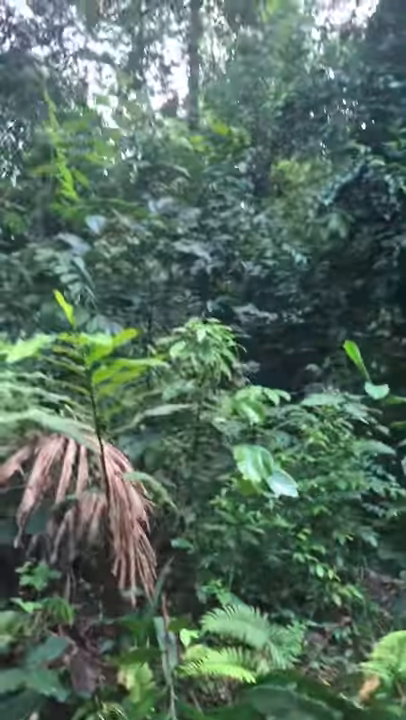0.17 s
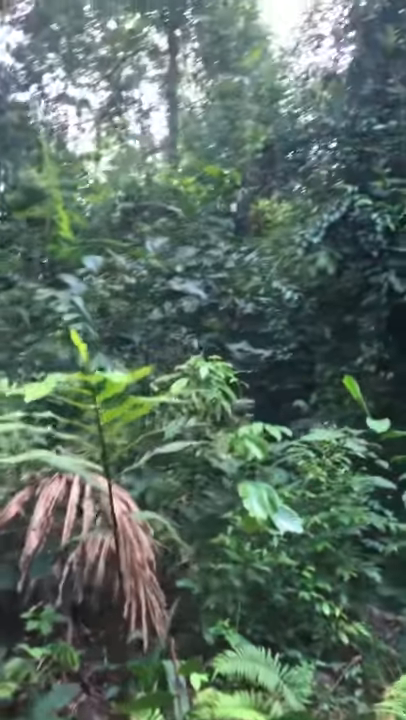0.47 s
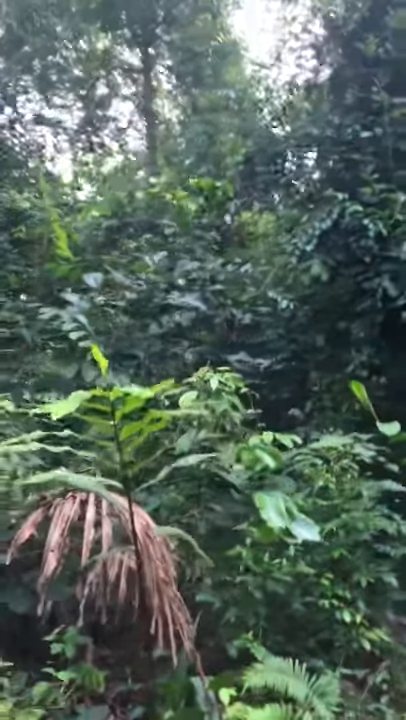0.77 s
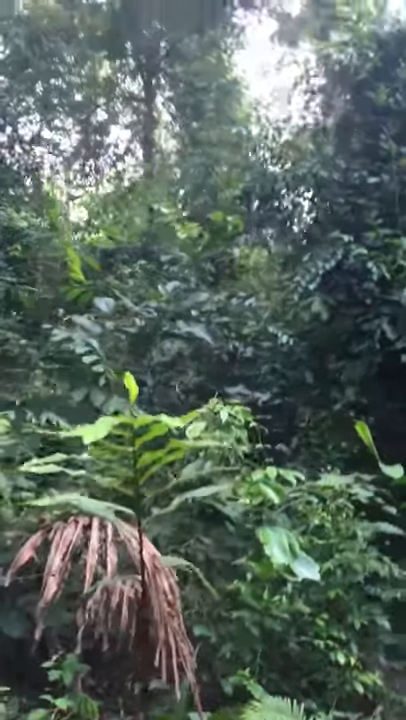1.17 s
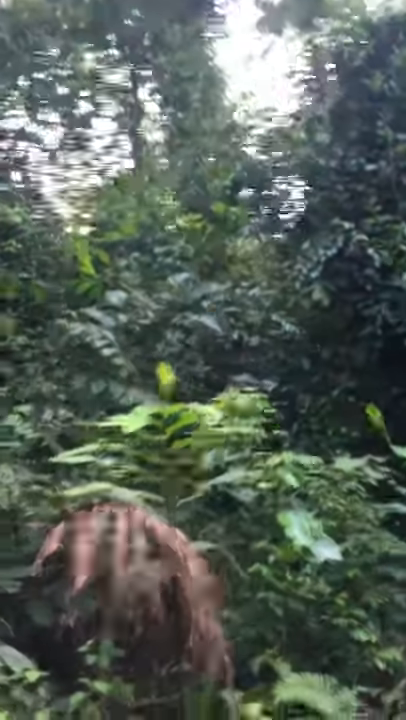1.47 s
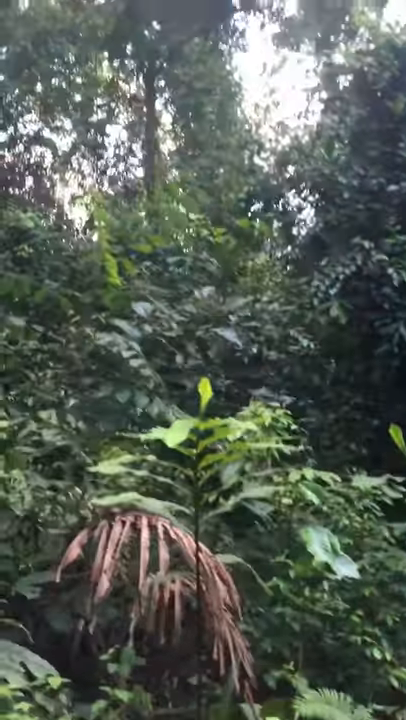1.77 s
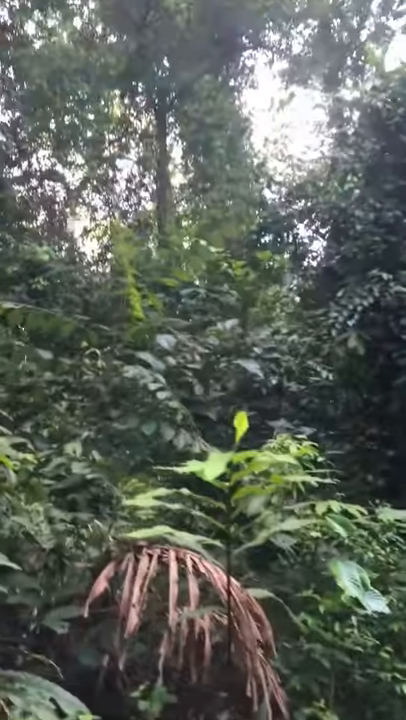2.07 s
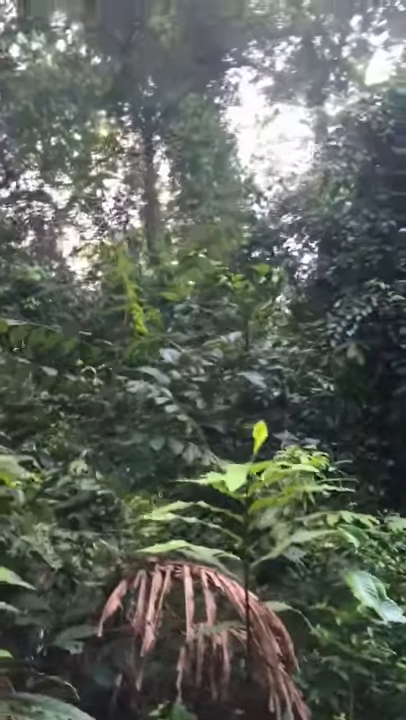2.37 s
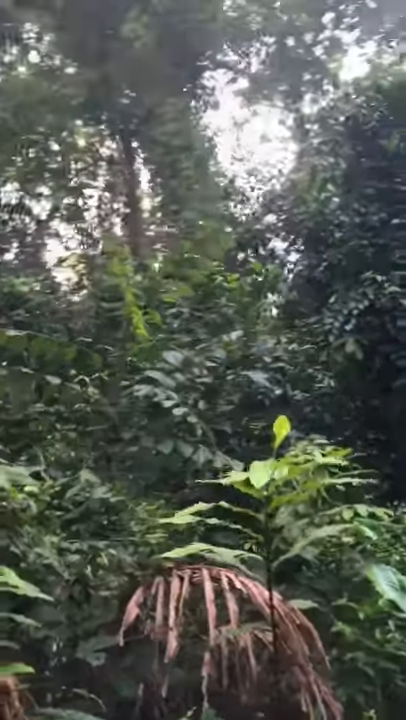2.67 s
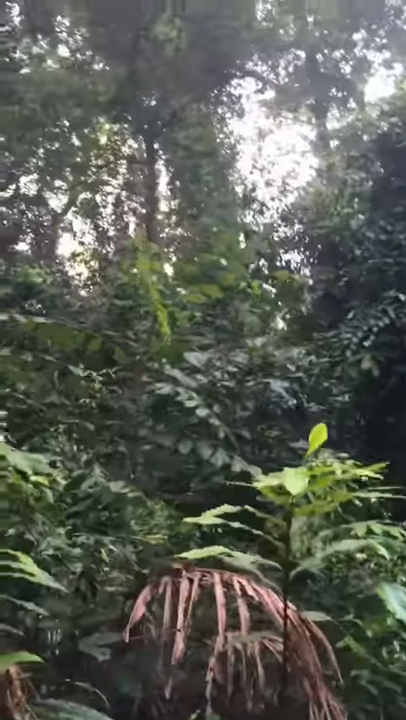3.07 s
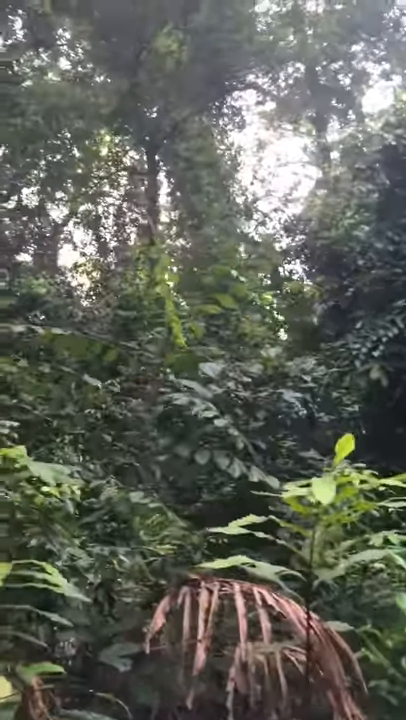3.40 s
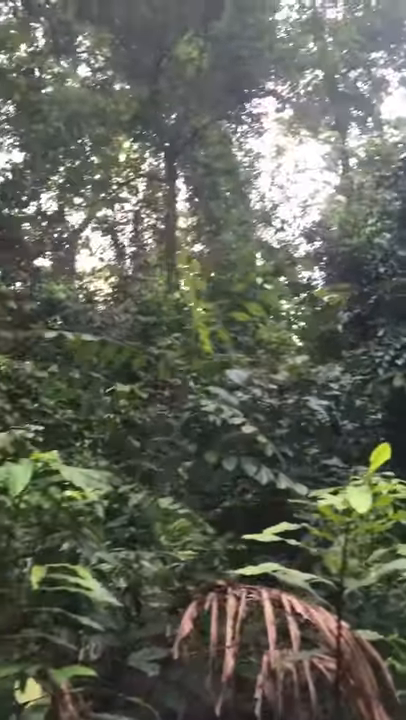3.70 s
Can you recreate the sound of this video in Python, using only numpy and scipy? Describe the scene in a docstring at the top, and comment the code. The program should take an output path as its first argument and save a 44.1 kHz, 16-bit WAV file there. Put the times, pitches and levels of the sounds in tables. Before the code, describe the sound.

Rising gibbon whoops echo through a rainforest, getting shorter and faster over soft insect hiss.

```python
"""A gibbon whoops in a rainforest: eleven rising, nearly pure calls that get shorter, faster and higher.
Foliage blurs them and the trunks scatter them into a tail that hangs among the trees.
Small birds chirp in quick slides, and a hand on the camera makes a few bumps and ticks.
Near the end something cracks in the undergrowth and the leaves rustle.
Behind it all, insects hiss steadily over a low forest murmur."""
import sys
import numpy as np
from scipy import signal
from scipy.fft import rfft, irfft
from scipy.io import wavfile
from scipy.ndimage import uniform_filter1d

SR = 44100
rng = np.random.default_rng(int(sys.argv[2]) if len(sys.argv) > 2 else 0)


def output_pcm(signal):
    """Save a mono or channel-first signal as 16-bit PCM at the path in sys.argv[1].

    Samples are clipped to [-1, 1] before scaling.
    """
    pcm = np.clip(np.atleast_2d(signal).T, -1, 1) * 32767
    wavfile.write(sys.argv[1], SR, np.round(pcm).astype(np.int16))


N = 169344

# One whoop a row: start_s, length_s, climb_from_hz, climb_to_hz, top_hz,
# leap_before_end_s, leap_time_s, overtone_db, overtone_entry_s
WHOOPS = [(-.06, .418, 629.6, 700.2, 1126, 0.025, 0.019, -5.5, .03),
          (0.587, 0.44, 640, 709, 1075, 0.031, 0.016, 2, 0.16),
          (1.215, 0.37, 649.8, 722.3, 1165, 0.021, 0.017, 2.5, 0.068),
          (1.761, 0.26, 677.4, 737.6, 1241, 0.019, 0.015, 1.5, 0.025),
          (2.172, 0.21, 661.3, 777.3, 1226, 0.021, 0.012, 2.5, 0.035),
          (2.515, 0.17, 664.8, 774, 1283, 0.023, .0124, 4.5, 0.078),
          (2.803, 0.15, 638, 800.4, 1241, 0.037, 0.012, 2.5, .08),
          (3.046, .13, 636, 821, 1237, .0335, 0.01133, 2, 0.059),
          (3.267, .12, 622.3, 793, 1230, .0354, 0.01092, 2, 0.047),
          (3.477, 0.12, 620.6, 818.6, 1209, 0.032, 0.0092, 0.5, 0.024),
          (3.677, 0.11, 644, 780, 1209, 0.035, 0.0098, 0.5, 0.04)]
# Level curves of the four long and the seven short whoops: time_s, level_db
LONG_WHOOP_LEVELS = [
    [(0.015, -45), (0.047, -36), (0.077, -36), (0.113, -35), (0.133, -50), (0.145, -35), (0.157, -39),
     (0.175, -46), (0.203, -36), (0.305, -36.5), (0.313, -36), (0.358, -50.5)],
    [(0.585, -34), (0.593, -47), (0.679, -40), (0.739, -36.5), (0.775, -35), (0.807, -45.5), (0.819, -46.5),
     (0.865, -35.5), (0.937, -38.5), (0.955, -33.5), (0.997, -41.5), (1.028, -49)],
    [(1.215, -54), (1.223, -51), (1.279, -36.5), (1.295, -44), (1.385, -35), (1.399, -32.5), (1.409, -51.5),
     (1.431, -32.5), (1.449, -41), (1.459, -32.5), (1.567, -41), (1.588, -41)],
    [(1.76, -54), (1.764, -46), (1.812, -43), (1.824, -38), (1.872, -37), (1.9, -32), (1.938, -30.5),
     (1.96, -40.5), (2.008, -38.5), (2.028, -41)],
]
SHORT_WHOOP_LEVELS = [
    [(2.175, -54), (2.185, -51.5), (2.213, -38), (2.221, -50), (2.245, -33.5), (2.295, -32), (2.305, -41.5),
     (2.365, -37), (2.383, -47.5)],
    [(2.51, -49.5), (2.546, -48.5), (2.578, -34), (2.616, -34.5), (2.642, -43.5), (2.66, -37), (2.692, -49)],
    [(2.8, -63), (2.818, -44.5), (2.836, -48), (2.87, -30), (2.89, -44.5), (2.908, -34.5), (2.938, -46.5)],
    [(3.045, -64), (3.051, -53), (3.101, -32.5), (3.121, -46.5), (3.129, -36), (3.161, -41), (3.175, -47)],
    [(3.27, -59), (3.284, -45.5), (3.306, -44), (3.32, -35), (3.374, -41), (3.39, -37.5)],
    [(3.48, -53.5), (3.508, -44.5), (3.522, -35.5), (3.58, -39.5), (3.595, -46.5)],
    [(3.68, -50), (3.708, -45.5), (3.72, -34), (3.766, -42.5), (3.785, -37)],
]
# EQ on the second harmonic: frequency_hz, gain_db
OVERTONE_EQ = [(1250, -16.5), (1380, -28.5), (1600, -21), (2000, -24), (2250, -14.5), (2380, -5),
               (2500, -23)]

def gibbon():
    """A nearly pure voice scoops up, climbs slowly and leaps; its octave opens up along the way."""
    scoop_hz, scoop_s, attack_s, release_s = 42.2, 0.0225, 0.005, 0.012
    out, waver = np.zeros(N), drift(size=300)
    for whoop, curve in zip(WHOOPS, list(LONG_WHOOP_LEVELS) + list(SHORT_WHOOP_LEVELS)):
        start, length, from_hz, to_hz, top_hz, before_end_s, leap_s, overtone_db, entry_s = whoop
        t = np.arange(0, length, 1 / SR)
        climb = from_hz + (to_hz - from_hz) * t / length - scoop_hz * np.exp(-t / scoop_s)
        hz = climb + (top_hz - climb) / (1 + np.exp((length - before_end_s - t) / leap_s))
        wobble = 1 + 0.006 * np.roll(waver, -round(start * SR))[:len(t)]
        phase = phase_of(hz * wobble)
        duck_db = -19.5 * np.clip(0.5 + (entry_s - t) / 0.014, 0, 1)  # holds the octave back at first
        overtone = amp(overtone_db + duck_db + curve_at(OVERTONE_EQ, 2 * hz)) * np.sin(2 * phase)
        gate = np.minimum(t / attack_s, 1) * np.minimum((length - t) / release_s, 1)
        level_db = uniform_filter1d(np.interp(start + t, *np.transpose(curve)), size=400) - 0.01
        add(out, start, np.sqrt(2) * amp(level_db) * gate * (np.sin(phase) + overtone))
    return out


# Bird notes: start_s, length_s, first_pitch_hz, last_pitch_hz, level_db
CHIRPS = [(.01, 0.045, 2570, 2483, -69), (0.64, 0.14, 4120, 4068, -69.5), (0.777, 0.21, 4140, 3990, -76.5),
          (0.85, 0.059, 3220, 3056, -66.5), (1.134, 0.032, 3460, 3750, -69),
          (1.176, 0.017, 2470, 3890, -61.5), (1.21, 0.025, 3060, 4470, -66),
          (1.24, 0.033, 5280, 3504, -57.5), (1.359, 0.0054, 4320, 3470, -55),
          (1.474, 0.039, 2880, 3840, -64.5), (1.513, 0.026, 3290, 4360, -65),
          (1.548, .044, 5290, 3510, -56.5), (2.816, 0.015, 3880, 3500, -60),
          (3.49, 0.045, 2750, 3600, -64.5), (3.542, 0.02, 2930, 3080, -57.5)]

def birds():
    """Thin whistles: falling notes drop fast and settle, rising notes slide evenly."""
    out, waver = np.zeros(N), drift(size=80)
    for start, length, first_hz, last_hz, db in CHIRPS:
        progress = np.arange(0, length, 1 / SR) / length
        bend = np.exp(-6 * progress) - np.exp(-6) if first_hz > last_hz else 1 - progress
        hz = last_hz + (first_hz - last_hz) * bend
        wobble = 1 + 0.0069 * np.roll(waver, -round(start * SR))[:len(progress)]
        arch = np.sqrt(2 * abs(np.sin(np.pi * progress)))
        add(out, start, amp(db) * arch * np.sin(phase_of(hz * wobble)))
    return out


# Bumps of the hand: start_s, thump_pitch_hz, thump_peak_s, thump_db, knock_db
BUMPS = [(0.232, 168, 0.0053, -55, -72), (0.436, 113, 0.0053, -60, -71), (0.532, 310, 0.0033, -56, -52),
         (.597, 248, 0.0017, -47, -48), (0.64, 185, 0.0044, -59, -43), (0.7514, 483, 0.00067, -64, -32.5),
         (0.95, 214, 0.0025, -40.5, -32), (1.671, 187, 0.0085, -55.5, -70), (2.0, 230, 0.0023, -56, -57),
         (2.482, 323, .0017, -47, -40), (2.582, 239.3, .003, -47, -39.5),
         (2.9395, 214, 0.0029, -43.5, -28.5), (3.171, 264, 0.0028, -60.5, -46),
         (3.436, 210, 0.003, -55.5, -49)]
# Ticks of the case: start_s, level_db
TICKS = [(0.4565, -39.5), (0.584, -48), (0.643, -50.5), (0.658, -51), (2.863, -42), (2.907, -49)]
# Tone of a knock and of a tick: frequency_hz, gain_db
KNOCK_EQ = [(30, -61), (120, -45), (400, 1), (900, 9.5), (1400, -6.5), (2500, -14.5), (5000, -27),
            (14000, -37)]
TICK_EQ = [(60, -58), (500, -26), (1200, -19), (1570, -5), (2000, -14), (2590, -8.5), (3200, -20),
           (4070, -17.5), (5500, -27), (8000, -33), (14000, -44)]

def handling():
    """A hand bumps the case: soft thumps with a knock on top, and dry ticks."""
    knock_lag_s, knock_decay_s, tick_decay_s = 0.004, 0.002, 0.0031
    out, t = np.zeros(N), np.arange(SR // 10) / SR
    for start, hz, peak_s, thump_db, knock_db in BUMPS:
        thump = t / peak_s * np.exp(1 - t / peak_s) * np.sin(2 * np.pi * hz * t)
        knock = noise(KNOCK_EQ)[:len(t)] * np.exp(-abs(t - knock_lag_s) / knock_decay_s)
        add(out, start, amp(thump_db) * thump + amp(knock_db) * knock)
    for start, db in TICKS:
        add(out, start, amp(db) * noise(TICK_EQ)[:len(t)] * np.exp(-t / tick_decay_s))
    return out


# Ring of the crack: pitch_hz, level_db, t60_s
CRACK_MODES = [(1900, -52.5, .35), (2747, -51.5, 0.81), (3230, -54, 0.78), (3570, -53.5, 0.85)]
# Snaps of leaf and twig: start_s, level_db
SNAPS = [(2.942, -55), (2.9477, -41), (2.975, -59), (3.128, -52)]
# Tone of a snap: frequency_hz, gain_db
SNAP_EQ = [(1000, -14), (4000, -4), (8000, -10), (10500, -7), (12500, 16), (14000, -4), (15500, -15)]

def crack():
    """Something cracks in the undergrowth and rings briefly, with sharp snaps of leaf and twig."""
    crack_start_s, snap_decay_s = 2.941, 0.00066
    out, t = np.zeros(N), np.arange(N) / SR
    for hz, db, t60 in CRACK_MODES:
        wobble = 1 + 0.0076 * drift(size=150)
        add(out, crack_start_s, amp(db - 60 * t / t60) * np.sin(phase_of(hz * wobble)))
    for start, db in SNAPS:
        add(out, start, amp(db) * noise(SNAP_EQ) * np.exp(-t / snap_decay_s))
    return out


# Bursts of rustle: start_s, rise_s, decay_s, level_db
RUSTLES = [(.2, 0.073, 0.11, -65), (0.586, 0.0075, 0.011, -48.5), (.63, 0.017, 0.42, -67.5),
           (0.943, 0.018, .04, -78), (2.86, 0.013, 0.031, -54), (2.941, 0.0046, 0.024, -44),
           (2.955, 0.0067, 0.058, -44.5), (3.099, 0.024, 0.07, -55)]
# Tone of the leaves: frequency_hz, gain_db
RUSTLE_EQ = [(200, -19), (700, -1), (1300, 1), (1700, -6.5), (1950, 4), (2400, -13), (2730, -2.5),
             (2950, -3), (3650, -2), (4500, -10.5), (7000, -22), (9300, -17.5), (13000, -37.5),
             (15500, -40)]

def leaves():
    """Leaves rustle in clumped, grainy bursts that rise quickly and die away."""
    envelope, t = np.zeros(N), np.arange(N) / SR
    for start, rise_s, decay_s, db in RUSTLES:
        burst = np.minimum(t / rise_s, 1) * np.exp(-np.maximum(t - rise_s, 0) / decay_s)
        add(envelope, start, amp(db) * burst)
    grains = rng.standard_normal(N) * amp(4 * drift(size=50))
    return envelope * patchy(coloured(grains, RUSTLE_EQ), depth_db=4.5)


# Insect choruses: pitch_hz, half_width_hz, level_db
CHORUSES = [(6950, 186, -63), (9030, 31, -83), (8900, 25, -79.5)]
# Swells of one insect's whistle: time_s, level_db
WHISTLE_SWELLS = [(0.0, -88), (0.06, -65), (0.12, -86), (0.17, -63), (0.3, -85), (0.43, -67), (0.66, -80.5),
                  (1.16, -65), (1.22, -71), (1.3, -61.5), (1.38, -79), (1.7, -68), (2.31, -75),
                  (2.38, -64.5), (2.93, -72.5), (2.96, -63), (3.14, -73), (3.84, -67.5)]

def insects():
    """Insects sing in steady, narrow bands while one thin whistle swells and fades."""
    chorus = sum(amp(db) * trill(hz, half_width_hz) for hz, half_width_hz, db in CHORUSES)
    swell_db = 1 + np.interp(np.arange(N) / SR, *np.transpose(WHISTLE_SWELLS))
    return chorus + amp(swell_db) * trill(hz=5375, half_width_hz=12)


# Tone of the distant hiss: frequency_hz, gain_db
HISS_EQ = [(400, -10), (800, -9.5), (1500, -10), (2500, -11), (3600, -12.5), (4900, -16.5), (5500, -7),
           (6000, -4), (6500, -6), (7400, -3.5), (7800, -16.5), (8200, -16), (8800, -11.5), (9600, -7),
           (10500, -20), (14000, -20), (15500, -27.5)]

def far_hiss():
    """Leaves and far insects merge into a wide, shimmering bed."""
    return amp(-63) * patchy(noise(HISS_EQ), depth_db=3)


# Tone of the forest air: frequency_hz, gain_db
MURMUR_EQ = [(15, -28), (25, -43), (45, -12), (70, 5), (120, 3.5), (250, 0.5), (400, -2.5), (520, -20),
             (700, -21), (1200, -60)]

def murmur():
    """The forest's faint, steady low end."""
    return amp(-75.5) * noise(MURMUR_EQ)


# EQ of the straight path and of the scatter off nearby leaves: frequency_hz, gain_db
DIRECT_EQ = [(600, 0), (750, .3), (950, 3), (1100, 5), (1220, 6.5), (1340, 0), (1450, -1), (1700, -10),
             (2400, -16), (3200, -10), (4000, -2)]
SCATTER_EQ = [(600, -3), (800, -23.5), (1100, -20.5), (1400, -31.5), (1800, 2), (2400, -6), (4000, 7.5)]

def foliage(x):
    """Foliage lets the low notes straight through and smears the treble into quick reflections."""
    scatter_decay_s = 0.0067
    t = np.arange(SR // 8) / SR
    taps = reflections(len(t)) * np.exp(-t / scatter_decay_s)
    x = np.pad(x, (0, len(t)))
    blur = signal.fftconvolve(coloured(x, SCATTER_EQ), taps / np.linalg.norm(taps))
    return coloured(x, DIRECT_EQ)[:N] + blur[:N]


# Decay of the forest reverb: frequency_hz, t60_s
REVERB_DECAY = [(300, 1.9), (680, 1.67), (1100, 0.94), (2400, 1.03), (4000, 0.91), (9000, .5)]
# Tone of the forest reverb: frequency_hz, gain_db
REVERB_EQ = [(300, -43), (580, -1), (690, -6.5), (850, -1), (1100, 0), (1500, -6), (2350, 2.5), (4000, -1),
             (9000, 1)]

def forest_reverb(x):
    """Trunks and leaves scatter the sound into a long, even tail."""
    hz, t, bands = signal.stft(unit(reflections(2 * SR)), SR, nperseg=512)
    t60 = curve_at(REVERB_DECAY, hz)[:, None]
    decay = amp(curve_at(REVERB_EQ, hz)[:, None] - 60 * t / t60)
    equal_energy = np.sqrt(2 * np.log(1000) / (t60 * SR))
    fade_in = np.minimum(t / 0.0064, 1)
    tail = signal.istft(bands * decay * equal_energy * fade_in, SR, nperseg=512)[1]
    return signal.fftconvolve(x, tail)[:N]


def amp(db):
    return 10 ** (np.asarray(db) / 20)


def unit(x):
    """Scales to rms 1."""
    return x / np.sqrt(np.mean(x ** 2) + 1e-20)


def phase_of(hz):
    """Running phase of a moving pitch."""
    return 2 * np.pi * np.cumsum(hz) / SR


def curve_at(points, hz):
    """Reads a curve on a log-frequency axis."""
    point_hz, value = np.transpose(points)
    return np.interp(np.log(hz + 1), np.log(point_hz + 1), value)


def add(mix, start_s, sound):
    """Mixes a sound in at its cue."""
    at = round(start_s * SR)
    part, sound = mix[max(0, at):], sound[max(0, -at):]
    part[:len(sound)] += sound[:len(part)]


def coloured(x, eq):
    """Applies an EQ curve."""
    return irfft(rfft(x) * amp(curve_at(eq, np.fft.rfftfreq(len(x), 1 / SR))), len(x))


def noise(eq):
    """Noise shaped by an EQ curve, at rms 1."""
    return unit(coloured(rng.standard_normal(N), eq))


def drift(size):
    """A random wander, smoothed twice over size samples."""
    smoothed = uniform_filter1d(rng.standard_normal(N), size, mode="wrap")
    return unit(uniform_filter1d(smoothed, size, mode="wrap"))


def reflections(size, per_second=3000):
    """Sparse echoes at random times and strengths."""
    return rng.standard_normal(size) * (rng.random(size) < per_second / SR)


def patchy(x, depth_db):
    """Lets the level wander in small patches of time and frequency, at overall rms 1."""
    bands = signal.stft(x, nperseg=512)[2]
    across_bands = uniform_filter1d(rng.standard_normal(bands.shape), size=3, axis=0)
    patches = unit(uniform_filter1d(across_bands, size=12, axis=1))
    return unit(signal.istft(bands * amp(depth_db * patches), nperseg=512)[1][:N])


def trill(hz, half_width_hz):
    """A band of noise so narrow that it flutters."""
    band = 1 / (1 + ((np.fft.rfftfreq(N, 1 / SR) - hz) / half_width_hz) ** 2)
    return unit(irfft(rfft(rng.standard_normal(N)) * band, N))


def scene():
    """Mono mix: calls and undergrowth feed the reverb; the hand and the background stay dry."""
    calls = gibbon() + birds()
    undergrowth = crack() + leaves()
    among_trees = foliage(calls) + undergrowth + forest_reverb(calls + amp(-3) * undergrowth)
    return (among_trees + handling() + far_hiss() + insects() + murmur())[None]


def record(dry):
    """A steep low-pass trims the very top."""
    cutoff_hz = 15400
    lowpass = signal.firwin(511, cutoff_hz, window=("kaiser", 9), fs=SR)
    return signal.oaconvolve(dry, lowpass[None], "same")


dry = scene()
out = record(dry)
output_pcm(out)
```